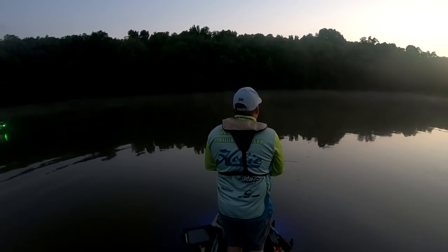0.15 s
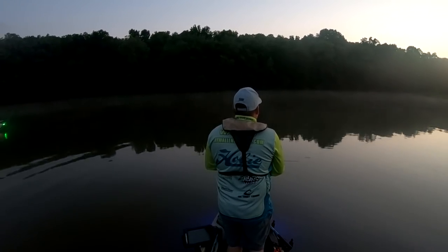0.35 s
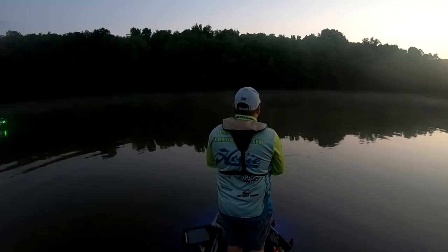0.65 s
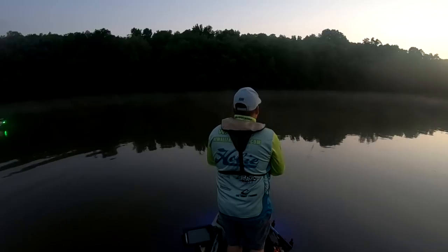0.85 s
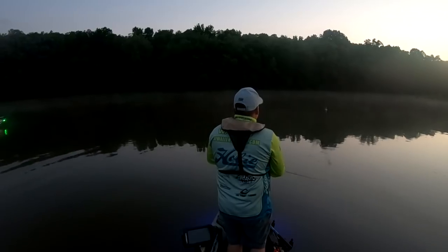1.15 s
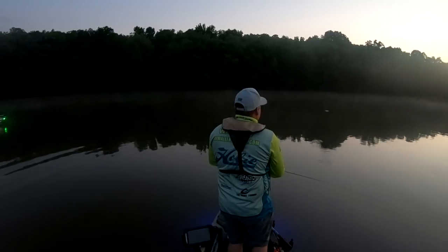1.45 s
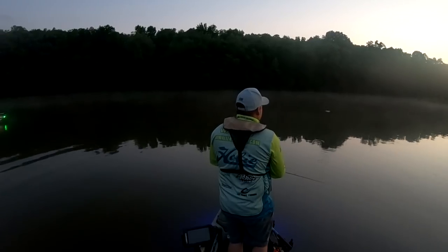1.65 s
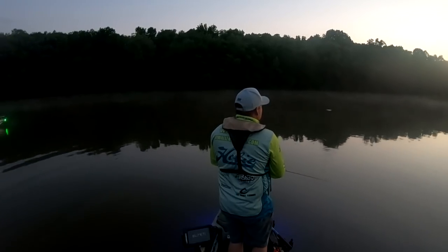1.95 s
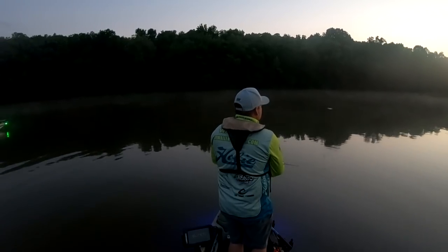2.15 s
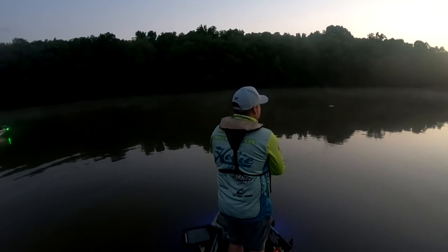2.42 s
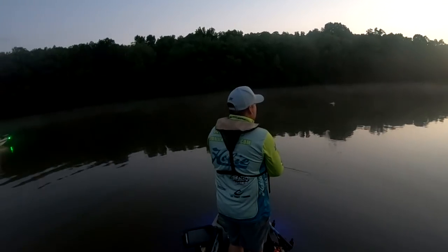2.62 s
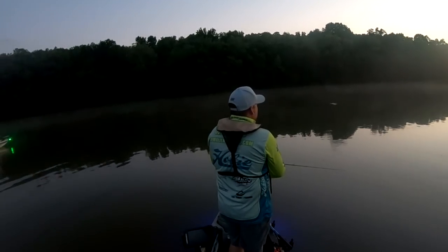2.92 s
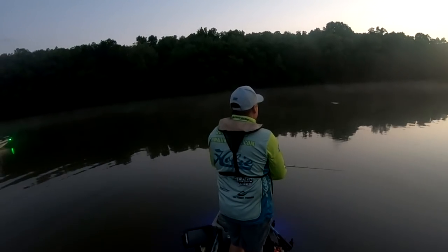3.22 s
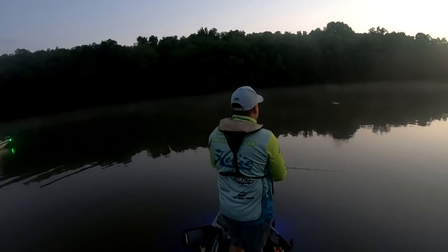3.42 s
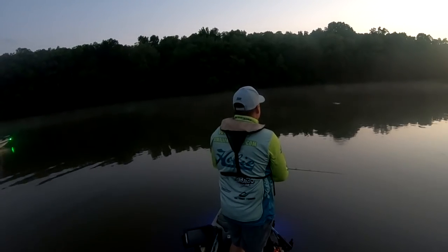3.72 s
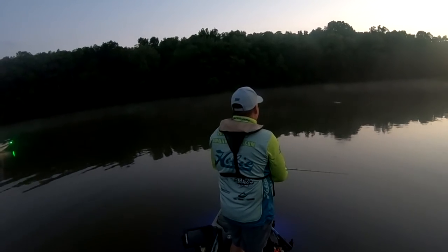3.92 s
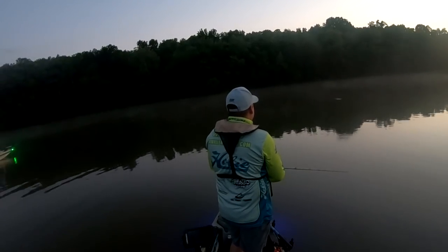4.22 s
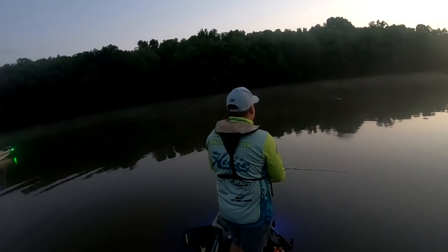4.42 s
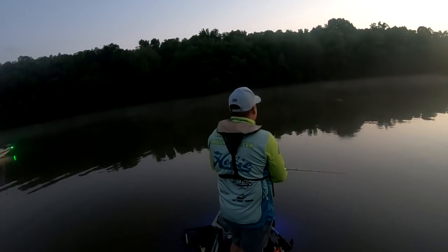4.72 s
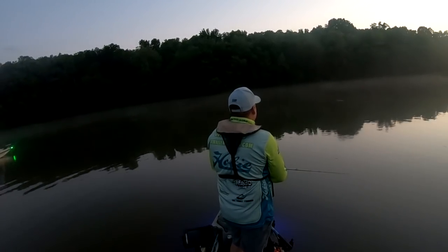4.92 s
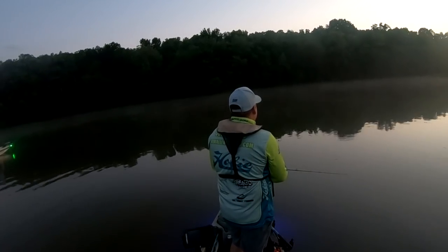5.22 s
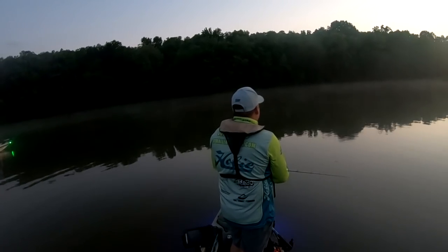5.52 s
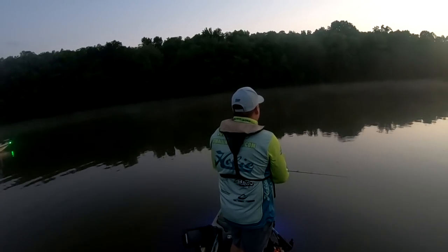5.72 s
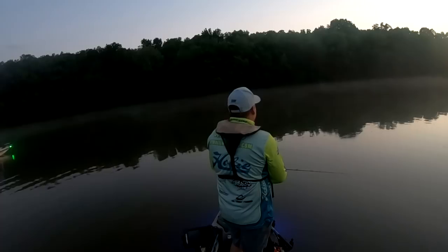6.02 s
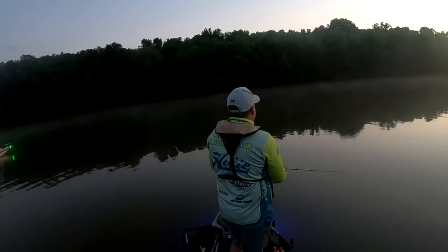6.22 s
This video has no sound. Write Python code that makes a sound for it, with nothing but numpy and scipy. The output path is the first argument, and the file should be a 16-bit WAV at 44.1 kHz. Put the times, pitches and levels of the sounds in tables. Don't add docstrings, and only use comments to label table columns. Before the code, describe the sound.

Many birds chip, buzz and slide in echoing woods across calm water, under uneven low wind rumble, faint ticks and boat creaks.

```python
import sys
import numpy as np
from scipy import signal
from scipy.fft import rfft, irfft, next_fast_len
from scipy.io import wavfile
from scipy.ndimage import uniform_filter1d

SR = 44100
rng = np.random.default_rng(int(sys.argv[2]) if len(sys.argv) > 2 else 0)


def nominal_scale(level):
    x = np.asarray(level, float) / 20
    return 10 ** x


def digitize_waveform(pressure):
    field = np.atleast_2d(pressure).T
    bounded = np.clip(field, -1, 1)
    quanta = np.round(bounded * 32767).astype(np.int16)
    wavfile.write(sys.argv[1], SR, quanta)


N = 280476
SIZE = next_fast_len(N + SR)
HZ = np.maximum(np.arange(SIZE // 2 + 1) * SR / SIZE, 1)
TIME_S = np.arange(N) / SR

# (frequency [Hz], left minus right [dB], left lead [rad], common share [0-1])
PORTS = [(30, -3.5, 0, .98), (170, -6, -.8, .85), (300, -3.5, -2.5, .88), (520, -1, -3.2, .95),
         (1300, 0, -3.4, .6), (2400, 0, -4.9, .75), (3500, -3, -5.4, .7), (4400, -8, -6.2, .6),
         (5500, -13, -6.9, .6), (7200, -9, -7.1, .6), (8200, 0, -7.1, 0)]

# (frequency [Hz], level [dB per Hz])
HUM_SPECTRUM = [(80, -33.5), (120, -14.5), (165, -3.5), (215, -11), (270, -24), (360, -23), (555, -24.5),
                (812, -25), (1040, -36), (1740, -42), (2600, -53), (4000, -86.5)]
# (frequency [Hz], level [dB per Hz])
HISS_SPECTRUM = [(600, -4.5), (1500, 7.5), (5000, 8.5), (8000, -0.5), (13000, -5.5)]
HUM_DB, HISS_DB = -51.5, -74.5

# (time [s], level [dB])
WIND = [(0.0, -39), (0.44, -32.5), (1.04, -42), (1.47, -27), (1.5, -36.5), (1.66, -32), (1.77, -53.5),
        (1.88, -35), (2.5, -22.5), (2.8, -35), (3.81, -33), (4.23, -27.5), (4.36, -46.5), (4.99, -38),
        (5.33, -44.5), (5.65, -24), (5.93, -31), (6.36, -29)]
# (time [s], rumble [dB], flutter [dB])
EDDIES = [(.22, -1.5, 3), (.43, -4.5, 3.5), (.53, 3.5, -0.5), (.6, -5, 5), (.71, 8, 8.5), (.79, -1.5, -2),
          (1.391, -8, -7.5), (1.45, 3, -0.5), (1.55, -5.5, 5.5), (1.98, 1.5, 5), (2.26, -14.5, 4.5),
          (2.98, 0, 3), (3.17, -4.5, -2.5), (3.41, 5.5, -4), (3.49, 1, -4.5), (3.87, -2.5, -9.5),
          (3.969, 6, 2.5), (4.14, 2.5, -8), (5.45, 0.5, -4), (5.63, 2.5, -7), (5.78, 0, -3.5),
          (6.12, 1.5, -5.5), (6.3, -1.5, -4.5), (4.46, 5, 2.5), (4.62, -8.5, -16), (4.71, -5, -14),
          (4.78, 0, 5), (5.04, 1.5, 3.5), (5.17, -3, -0.5), (6.21, 0, -7), (4.55, -2, -9), (1.52, -6, -5),
          (5.68, 3, 0), (.33, 0, 4), (1.31, 0, 4), (1.62, -5, 0), (2.37, 2, 2)]
# (frequency [Hz], level [dB per Hz])
RUMBLE_SPECTRUM = [(15, -5), (30, 5), (60, 4), (85, -8.5), (120, -55.5), (240, -120)]
# (frequency [Hz], level [dB per Hz])
FLUTTER_SPECTRUM = [(50, -18), (80, 2.5), (130, -5), (190, -19), (260, -35.5), (400, -49), (900, -120)]
RUMBLE_DB, FLUTTER_DB, FLUTTER_DB_PER_WIND_DB, EDDY_S = 3, -5, 1.2, 0.045

# (time [s], low voices [dB], high voices [dB])
FAR_LEVELS = [(0, -63.5, -73), (1.2, -62.5, -71), (2.4, -64.5, -71.5), (2.7, -60.5, -64.5),
              (3.598, -65.5, -63.5), (4.899, -61.5, -69.5), (5.201, -62, -72.5), (6.36, -63.5, -70.5)]
# (frequency [Hz], level [dB per Hz])
FAR_LOW_SPECTRUM = [(1000, -74), (1600, -27), (2000, -13), (2700, -3), (3300, -5), (4300, -16.5),
                    (5000, -39.5), (7000, -82.5)]
# (frequency [Hz], level [dB per Hz])
FAR_HIGH_SPECTRUM = [(3000, -67), (4100, -20.5), (4700, -6), (5300, -1), (6300, -8), (7400, -17.5),
                     (8000, -38), (9500, -81.5)]

# (time from start [s], pitch [Hz])
HOOK_SHAPE = [(0, 5799.5), (.006, 7149.5), (.014, 7300), (.026, 7049.5), (.036, 6200.5), (.043, 4900.5)]
# (time [s], first level [dB], second level [dB])
HOOK_PAIRS = [
    (-.004, -62.5, -67),
    (.659, -61, -66),
    (1.384, -61.5, -66),
    (2.046, -58.5, -65.5),
    (2.707, -57.5, -63),
    (4.225, -55.5, -94),
    (4.782, -60, -62),
    (5.705, -57.5, -92),
]
HOOK_GAP_S = .114
# (time [s], length [s], start [Hz], middle [Hz], end [Hz], level [dB])
BUZZES = [
    (.135, 0.11, 5680, 5890, 5370, -65.5),
    (1.567, 0.1, 5700, 5960, 5170, -61.5),
    (4.445, 0.115, 5770, 5920, 5240, -62.5),
]
BUZZ_VIBRATO_HZ, BUZZ_DEPTH_HZ = 150, 436
# (time [s], length [s], start [Hz], end [Hz], level [dB])
SWOOPS = [
    (2.555, 0.1, 6970, 4890, -66),
    (3.195, 0.086, 6700, 5290, -58),
    (3.645, .065, 3885, 3320, -60.5),
]
SWOOP_SWELL_DB = 8
# (time from start [s], pitch [Hz])
WAVE_SHAPE = [(0, 5220), (.03, 5440), (.055, 5800), (.08, 6440), (.095, 6650), (.12, 5800), (.15, 4860),
              (.185, 4680)]
# (time [s], level [dB])
WAVE_CALLS = [(2.835, -58.5)]
# (time from start [s], pitch [Hz])
CAP_SHAPE = [(0, 6280), (.008, 7070), (.025, 7050), (.035, 6500), (.044, 5220)]
# (time [s], level [dB])
CAP_CALLS = [(3.42, -58)]
# (time from start [s], pitch [Hz])
DROP_SHAPE = [(0, 6600), (.02, 5920), (.045, 4900), (.068, 4250), (.085, 4240)]
# (time [s], level [dB])
DROP_CALLS = [(3.563, -60)]
# (time from start [s], pitch [Hz])
ZIGZAG_SHAPE = [(0, 4696), (.032, 7104), (.05, 5700.5), (.077, 7005.5)]
# (time from start [s], pitch [Hz])
SLIDE_SHAPE = [(0, 5040), (.012, 5340), (0.039, 4930), (.066, 4220)]
# (zigzag level [dB], slide level [dB])
ZIGZAG_LEVELS = [
    (-65.5, -70),
    (-68.5, -67),
    (-62, -65.5),
    (-60.5, -65),
    (-57, -62.5),
    (-57.5, -93),
]
ZIGZAG_FROM_S, ZIGZAG_EVERY_S, SLIDE_AFTER_S = 3.597, .2374, .168

# (time [s], length [s], start [Hz], end [Hz], level [dB])
FALLS = [(.022, 0.033, 3500, 3240, -64), (1.04, .014, 3600, 2900, -61), (5.394, .006, 3200, 2900, -58.5),
         (5.58, 0.056, 3250, 2700, -70), (.93, .017, 4780, 4300, -67), (1.314, 0.004, 6100, 5300, -65),
         (1.36, .014, 5100, 3650, -67), (2.052, 0.023, 3400, 3000, -66.5), (2.072, 0.032, 2500, 1950, -69),
         (2.107, 0.055, 2870, 2600, -58.5), (2.757, 0.04, 3800, 2100, -62), (2.929, 0.048, 3900, 2050, -64),
         (2, .025, 2550, 2380, -67.5), (2.572, 0.027, 2550, 2350, -66.5), (3.685, .018, 4280, 3950, -62),
         (2.575, .05, 3600, 3300, -66), (3.863, 0.031, 3940, 3580, -56.5),
         (4.037, 0.055, 5900, 3500, -64.5), (3.48, .012, 2600, 2200, -66), (3.322, .01, 5000, 3900, -68),
         (5.061, .049, 2900, 2400, -65.5), (5.373, .005, 5100, 4300, -70),
         (5.688, 0.004, 5500, 3500, -65.5), (5.92, .046, 5780, 5280, -63.5), (.715, .05, 2830, 2300, -68.5),
         (1.01, .055, 3500, 2400, -72), (1.266, .01, 4600, 2950, -67), (1.4, .022, 2650, 2200, -64),
         (1.6, .07, 3500, 2900, -67.5), (.262, 0.061, 6750, 6400, -75.5), (4.245, .012, 6800, 5100, -62),
         (4.445, .06, 4550, 4000, -72), (4.26, 0.014, 3100, 3150, -66), (6.168, .008, 3850, 3600, -66),
         (5.2, 0.028, 3600, 2600, -64), (4.3, .04, 5200, 3700, -74), (3.135, .033, 2750, 2050, -73),
         (3.335, .027, 2600, 2200, -73)]
# (time [s], length [s], pitch [Hz], level [dB])
PIPS = [(0.88, 0.008, 3630, -62), (2.212, 0.04, 5200, -66), (2.228, 0.062, 2600, -64),
        (.675, 0.028, 4260, -76.5), (0.84, .008, 4250, -69), (2.5, 0.086, 2610, -62),
        (2.135, .008, 3170, -66.5), (2.8, .008, 3800, -68), (2.987, .008, 3090, -61), (3.6, .02, 6270, -67),
        (3.385, .014, 3450, -66.5), (3.2, .03, 6550, -72), (4.01, 0.033, 3520, -67.5),
        (4.28, 0.03, 3670, -67), (5.105, 0.058, 3430, -66.5), (5.38, .009, 3560, -57.5),
        (6.018, 0.016, 6080, -69.5), (6.11, .03, 1970, -64), (4.555, .008, 4350, -69.5),
        (1.2, .008, 3050, -62), (2.63, .042, 4900, -66), (2.992, .022, 4700, -64), (2.562, .008, 3300, -58),
        (2.88, .012, 5740, -63), (3.288, .006, 5700, -66), (3.312, .008, 5750, -67),
        (4.088, .006, 3500, -66), (3.545, .022, 7250, -72), (5.362, .01, 4850, -69), (6.2, .01, 5050, -69),
        (.925, .02, 2920, -63)]
# (time from start [s], pitch [Hz])
PLUNGE_SHAPE = [(0, 5480), (.022, 4950), (.045, 4050), (.065, 3500), (.088, 3280)]
# (time [s], level [dB])
PLUNGE_CALLS = [(2.486, -53)]
# (time from start [s], pitch [Hz])
DIVE_SHAPE = [(0, 4253), (.015, 3900), (.04, 3050), (.065, 2550), (.09, 1995)]
# (time [s], level [dB])
DIVE_CALLS = [(3.042, -55), (3.243, -54.5)]
# (time [s], length [s], start [Hz], middle [Hz], end [Hz], level [dB])
TRILLS = [(3.458, 0.185, 3794, 3854, 3900, -67)]
# (time [s], length [s], start [Hz], middle [Hz], end [Hz], level [dB])
QUIVERS = [(3.712, .14, 3940, 3970, 3960, -61.5), (3.9, 0.11, 3980, 3980, 3970, -71)]
# (length [s], start [Hz], end [Hz])
DROOP_NOTE = (.095, 2420, 1930)
# (time [s], level [dB])
DROOP_CALLS = [(5.275, -66), (5.757, -64.5)]
# (time from start [s], length [s], start [Hz], end [Hz], level [dB])
UPSTAIR_STEPS = [(-.02, 0.018, 2200, 2730, -5.5), (0, .012, 2860, 3100, 1), (.016, .008, 3400, 3680, -1.5),
                 (.033, .018, 4140, 4230, -7.5)]
# (time [s], level [dB])
UPSTAIR_CALLS = [(5.552, -61), (5.743, -59.5)]
# (time from start [s], length [s], start [Hz], end [Hz], level [dB])
STAIR_STEPS = [(0, .016, 4310, 3940, -10), (0.021, .009, 3800, 3390, 5.5), (0.036, .011, 3250, 2850, 2),
               (.062, 0.013, 3190, 2870, 3)]
# (time [s], level [dB])
STAIR_CALLS = [(6.105, -57.5), (6.24, -58.5)]

# (time [s], length [s], pitch [Hz], level [dB])
HELD = [(.06, .14, 3104, -72), (.557, 0.15, 2760, -64.5), (.94, 0.045, 2960, -63.5),
        (1.07, 0.098, 2990, -69), (1.28, 0.14, 3010, -61.5), (1.717, 0.056, 3007, -62),
        (1.8, 0.21, 3040, -75.5), (2.6, 0.074, 2666, -73), (2.8, .06, 2500, -76), (2.89, .11, 2660, -70),
        (3.18, 0.1, 2660, -72.5), (5.435, .06, 2650, -69), (2.595, 0.032, 3400, -59.5),
        (4.216, 0.088, 2788, -66), (4.328, 0.029, 2800, -65), (4.553, 0.096, 2893, -64.5),
        (4.917, 0.029, 2940, -62), (5.02, 0.063, 3020, -66), (5.425, 0.056, 3620, -72),
        (6.07, .06, 2620, -71)]
# (time [s], level [dB])
ANSWERS = [(.77, -67), (1.11, -64.5), (1.475, -70.5), (1.85, -69.5), (4.409, -70), (4.758, -67), (5.1, -69)]
ANSWER_S, ANSWER_HZ = .036, 2357

# (time [s], length [s], start [Hz], end [Hz], level [dB])
CLIMBS = [(1.195, .07, 2960, 4480, -73.5), (1.29, .03, 2590, 4440, -63.5), (1.818, .045, 4610, 5520, -71.5),
          (3.794, .18, 2190, 3100, -70), (4.7, 0.03, 3090, 4770, -68), (5.0, 0.03, 3300, 4200, -72),
          (.6, .016, 3100, 4650, -72), (.915, .014, 3100, 4700, -72), (.2, .032, 3430, 4650, -72),
          (2.49, .085, 5410, 7300, -77), (4.055, .025, 2800, 3220, -65)]
# (time from start [s], pitch [Hz])
TOWER_SHAPE = [(0, 2950), (.013, 3900), (.026, 5800), (.057, 6000), (.065, 4400), (.074, 3400),
               (.084, 2800)]
# (time [s], level [dB])
TOWER_CALLS = [(0.315, -62), (4.737, -61)]
# (time [s], length [s], start [Hz], end [Hz], level [dB])
SCOOPS = [(.62, 0.018, 3150, 3590, -67), (1.976, 0.028, 3740, 4090, -68.5), (3.987, 0.017, 4620, 4910, -68),
          (5.038, 0.016, 3370, 3590, -60), (1.62, 0.05, 2583, 2960, -61), (2.299, 0.094, 3037, 3260, -56),
          (2.333, 0.081, 3660, 4170, -68.5), (2.612, 0.076, 3750, 4210, -68.5),
          (2.788, .075, 1985, 2115, -66), (2.992, 0.037, 2190, 2380, -71), (3.365, .035, 4370, 4560, -66.5),
          (5.21, 0.074, 2788, 3235, -58.5), (5.93, 0.058, 4580, 5080, -70), (3.645, 0.04, 4300, 4860, -69),
          (4.955, 0.018, 4190, 4350, -72), (6.328, .026, 2200, 2380, -61), (4.862, .025, 3490, 4000, -70),
          (6.045, .02, 2205, 2400, -64.5)]
# (time from start [s], pitch [Hz])
TENT_SHAPE = [(0, 2590), (.025, 3150), (.052, 4230), (.085, 3790), (.12, 3200), (.175, 2720)]
# (time [s], level [dB])
TENT_CALLS = [(.778, -62), (5.208, -59)]
# (time from start [s], pitch [Hz])
ARCH_SHAPE = [(0, 2970), (.025, 3546), (.05, 4310), (.07, 4540), (.09, 4200), (.115, 3177), (.145, 2610)]
# (time [s], level [dB])
ARCH_CALLS = [(1.334, -59)]

BANK_DB = 3
WOOD_T60_S, WOOD_DB = .36, -4.5

# (time [s], peak [dB], centre [Hz])
TICKS = [(.9956, -46, 3700), (.9954, -55, 1600), (1.1568, -50, 1100), (1.1572, -47, 2300),
         (1.3154, -55, 900), (1.518, -54, 5450), (1.737, -55, 3600), (2.5321, -53, 1500),
         (2.6535, -55, 1200), (2.666, -55, 950), (2.6844, -51, 1700), (2.697, -57, 1200),
         (5.878, -54, 5600)]
# (time [s], peak [dB], ring [Hz])
CREAKS = [(2.658, -49.5, 900), (2.662, -34, 480), (2.7, -42, 257), (2.718, -44.5, 302), (3.02, -44.5, 304),
          (3.34, -40, 275), (3.345, -38, 460), (3.366, -44.5, 271), (3.45, -45, 292), (3.94, -48.5, 326),
          (4.175, -43.5, 315), (1.54, -48, 500), (2.3, -49.5, 260), (2.4, -46.5, 268)]
# (time [s], peak [dB], ring [Hz])
BUMPS = [
    (2.6725, -15.5, 150),
    (2.689, -12, 128),
]
TICK_LEFT_DB = -11


def unit(x):
    return x / np.sqrt(np.mean(x ** 2))


def along(table, column):
    rows = np.array(table, float)
    return np.interp(np.log(HZ), np.log(rows[:, 0]), rows[:, column])


def colour(x, spectrum):
    return unit(irfft(rfft(x, SIZE) * nominal_scale(along(spectrum, 1)), SIZE)[..., :N])


def walk(rate_hz):
    hold = int(SR / rate_hz)
    steps = np.repeat(rng.standard_normal(N // hold + 1), hold)
    return unit(uniform_filter1d(uniform_filter1d(steps, hold), hold)[:N])


def ports(direct, other=None):
    left = right = rfft(direct, SIZE)
    if other is not None:
        common = np.clip(along(PORTS, 3), 0, 1)
        left = common * right + np.sqrt(1 - common ** 2) * rfft(other, SIZE)
    tilt = nominal_scale(along(PORTS, 1))
    left = left * tilt * np.exp(1j * along(PORTS, 2))
    return irfft(np.array([left, right]) / np.sqrt(1 + tilt ** 2), SIZE)[:, :N]


def air():
    hum = ports(*colour(rng.standard_normal((2, N)), HUM_SPECTRUM))
    hiss = colour(rng.standard_normal((2, N)), HISS_SPECTRUM)
    return hum * nominal_scale(HUM_DB) + hiss * nominal_scale(HISS_DB)


def wind():
    wind_db = np.interp(TIME_S, *np.transpose(WIND))
    mean_db = wind_db.mean()
    deep_db, flutter_db = sum(np.outer(db, np.exp(-((TIME_S - s) / EDDY_S) ** 2)) for s, *db in EDDIES)
    deep_db = deep_db + wind_db + RUMBLE_DB
    flutter_db = flutter_db + mean_db + FLUTTER_DB_PER_WIND_DB * (wind_db - mean_db) + FLUTTER_DB
    deep = colour(rng.standard_normal((2, N)), RUMBLE_SPECTRUM) * nominal_scale(deep_db + 3.3 * walk(12))
    flutter = colour(rng.standard_normal((2, N)), FLUTTER_SPECTRUM) * nominal_scale(flutter_db + 2.58 * walk(14))
    return ports(*(deep + flutter))


def woods(x, t60_s):
    t = np.arange(SR) / SR
    decay = np.exp(-np.log(1000) * t / t60_s)
    tails = rng.standard_normal((2, SR)) * decay * np.minimum(t / 0.012, 1)
    tails *= nominal_scale(3.7 * rng.exponential(size=(2, SR)))
    tails /= np.sqrt(np.sum(tails ** 2, axis=1, keepdims=True))
    return irfft(rfft(x, SIZE) * rfft(tails, SIZE), SIZE)[:, :N]


def whistles(notes, depth_hz=0., rate_hz=0., swell_db=0.):
    out = np.zeros(N + SR)
    for s, length_s, hz0, hz1, hz2, db in notes:
        count = int((length_s + 0.00808) * SR)
        u = np.arange(count) / count
        swing_hz = depth_hz * np.cos(2 * np.pi * rate_hz * np.arange(count) / SR)
        bend_hz = hz0 * (1 - u) * (1 - 2 * u) + 4 * hz1 * u * (1 - u) + hz2 * u * (2 * u - 1)
        phase = 2 * np.pi * np.cumsum(bend_hz + swing_hz) / SR
        shape = np.sin(np.pi * u) ** 0.26 * (1 - swing_hz / 1200) * nominal_scale(swell_db * (u - .5))
        start = max(int((s - .004) * SR), 0)
        out[start:start + count] += 2 * nominal_scale(db) * shape * np.sin(phase)
    return out[:N]


def crowd(spectrum, lo_hz, hi_hz, count, dry_db):
    when, stretch, place, way, bow, loud = rng.random((count, 6)).T
    hz = lo_hz + (hi_hz - lo_hz) * place
    bend_hz = np.where(way < .6, -1, 1) * (30 + 500 * bow ** 2)
    length_s = .012 + .05 * stretch ** 2
    notes = np.transpose([when * N / SR, length_s, hz - bend_hz, hz + bend_hz / 4, hz + bend_hz, 8 * loud])
    song = unit(whistles(notes))
    blur = unit(woods(song, 1.2)) + .3 * rng.standard_normal((2, N))
    return ports(*colour(nominal_scale(dry_db) * song + blur, spectrum))


def chorus():
    s, low_db, high_db = np.transpose(FAR_LEVELS)
    low = crowd(FAR_LOW_SPECTRUM, 1800, 4600, count=900, dry_db=-5)
    high = crowd(FAR_HIGH_SPECTRUM, 4300, 7700, count=800, dry_db=-7)
    return low * nominal_scale(np.interp(TIME_S, s, low_db)) + high * nominal_scale(np.interp(TIME_S, s, high_db))


def repeats(shape, calls, best_hz):
    s, hz = np.transpose(shape)
    out = np.zeros(N + SR)
    lead = SR // 100
    t = np.arange(int(s[-1] * SR)) / SR
    pitch_hz = uniform_filter1d(np.interp(t, s, hz), SR // 150)
    voice = np.sin(np.pi * t / s[-1]) ** .4 * nominal_scale(-9 * ((pitch_hz - best_hz) / 1300) ** 2)
    for (start_s, db), vary in zip(calls, rng.standard_normal(len(calls))):
        k = int(start_s * SR) + lead
        phase = 2 * np.pi * np.cumsum(pitch_hz * (1 + 0.0046 * vary)) / SR
        out[k:k + len(t)] += 2 * nominal_scale(db) * voice * np.sin(phase)
    return out[lead:][:N]


def glides(notes, early, swell_db=0.):
    bent = [(s, length_s, hz0, hz0 + early * (hz1 - hz0), hz1, db) for s, length_s, hz0, hz1, db in notes]
    return whistles(bent, swell_db=swell_db)


def level_notes(notes):
    return whistles([(s, length_s, hz, hz, hz, db) for s, length_s, hz, db in notes])


def high_singers():
    firsts = [(s, db) for s, db, _ in HOOK_PAIRS]
    seconds = [(s + HOOK_GAP_S, db) for s, _, db in HOOK_PAIRS]
    song = repeats(HOOK_SHAPE, firsts + seconds, 5600)
    song += whistles(BUZZES, BUZZ_DEPTH_HZ, BUZZ_VIBRATO_HZ)
    song += glides(SWOOPS, .77, SWOOP_SWELL_DB)
    song += repeats(WAVE_SHAPE, WAVE_CALLS, 5280)
    song += repeats(CAP_SHAPE, CAP_CALLS, 5900)
    song += repeats(DROP_SHAPE, DROP_CALLS, 5400)
    beats_s = ZIGZAG_FROM_S + ZIGZAG_EVERY_S * np.arange(len(ZIGZAG_LEVELS))
    zigzag_db, slide_db = np.transpose(ZIGZAG_LEVELS)
    song += repeats(ZIGZAG_SHAPE, list(zip(beats_s, zigzag_db)), 5800)
    return song + repeats(SLIDE_SHAPE, list(zip(beats_s + SLIDE_AFTER_S, slide_db)), 4900)


def stairs(steps, calls):
    return [(s + after_s, length_s, hz0, hz1, db + step_db)
            for s, db in calls for after_s, length_s, hz0, hz1, step_db in steps]


def low_singers():
    falls = FALLS + stairs(STAIR_STEPS, STAIR_CALLS) + stairs(UPSTAIR_STEPS, UPSTAIR_CALLS)
    song = glides(falls, .53)
    song += level_notes(PIPS)
    song += repeats(PLUNGE_SHAPE, PLUNGE_CALLS, 3100)
    song += repeats(DIVE_SHAPE, DIVE_CALLS, 3400)
    song += whistles(TRILLS, depth_hz=120, rate_hz=52)
    song += whistles(QUIVERS, depth_hz=35, rate_hz=58)
    return song + glides([(s, *DROOP_NOTE, db) for s, db in DROOP_CALLS], .6)


def left_bank():
    return level_notes(HELD + [(s, ANSWER_S, ANSWER_HZ, db) for s, db in ANSWERS])


def right_bank():
    song = glides(CLIMBS, .34) + glides(SCOOPS, .77)
    song += repeats(TOWER_SHAPE, TOWER_CALLS, 4350)
    song += repeats(TENT_SHAPE, TENT_CALLS, 2700)
    return song + repeats(ARCH_SHAPE, ARCH_CALLS, 3070)


def birds():
    waver = nominal_scale(2.4 * walk(110))
    ahead = waver * (high_singers() + low_singers())
    left = waver * left_bank()
    right = waver * right_bank()
    bank = nominal_scale(np.array([[BANK_DB], [-BANK_DB]]))
    direct = ports(ahead) + ports(left) * bank + ports(right) / bank
    return direct + nominal_scale(WOOD_DB) * ports(*woods(ahead + left + right, WOOD_T60_S))


def rings(hits, cycles):
    out = np.zeros(N)
    for s, db, hz in hits:
        turns = np.maximum(TIME_S - s, 0) * hz
        envelope = np.e * turns / cycles * np.exp(-turns / cycles)
        out += nominal_scale(db) * envelope * np.sin(2 * np.pi * turns)
    return out


def boat():
    ticks = np.outer([nominal_scale(TICK_LEFT_DB), 1], rings(TICKS, cycles=0.79))
    creaks = ports(rings(CREAKS, cycles=1.6))
    bumps = rings(BUMPS, cycles=0.45)
    return ticks + creaks + np.array([-.25 * bumps, bumps])


def scene():
    return air() + wind() + chorus() + birds() + boat()


def roll_off(x):
    return signal.sosfilt(signal.butter(12, 12750, fs=SR, output="sos"), x)


def record(dry):
    return roll_off(dry)


dry = scene()
out = record(dry)
digitize_waveform(out)
```